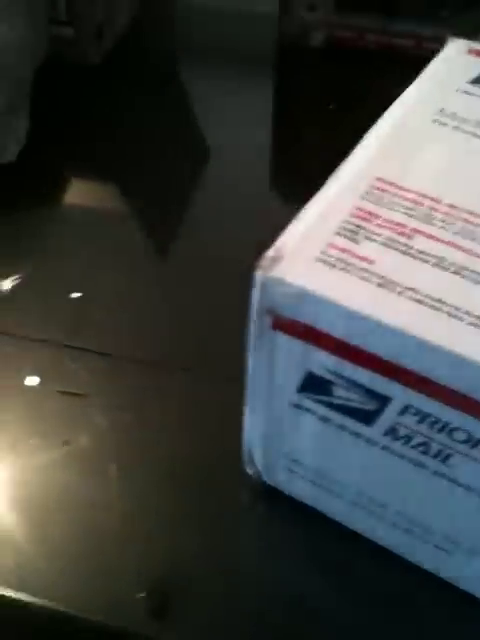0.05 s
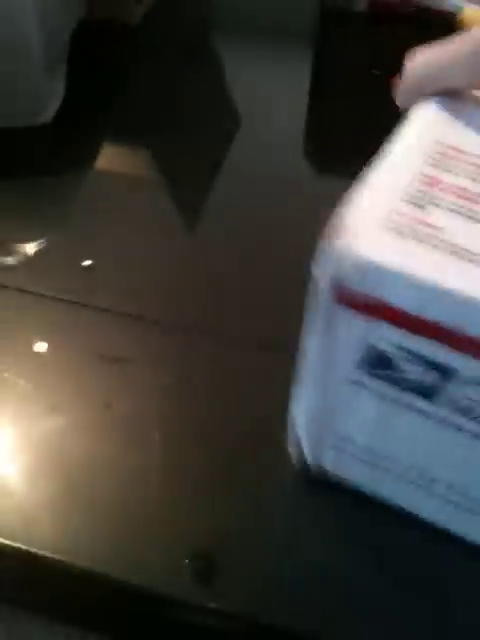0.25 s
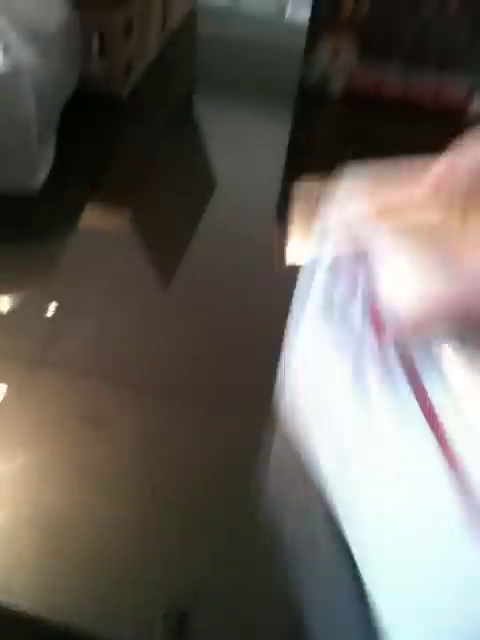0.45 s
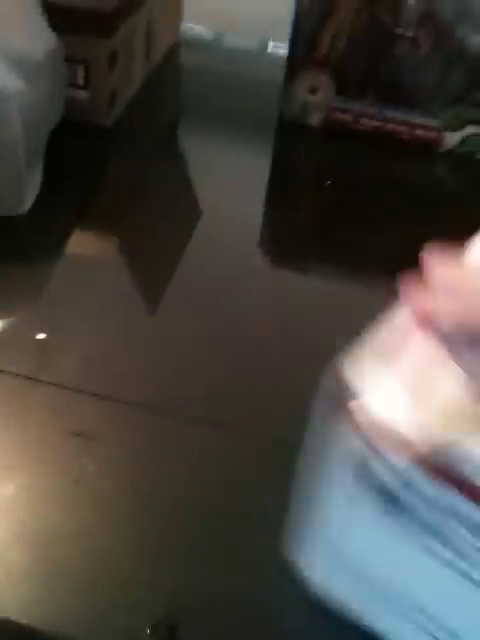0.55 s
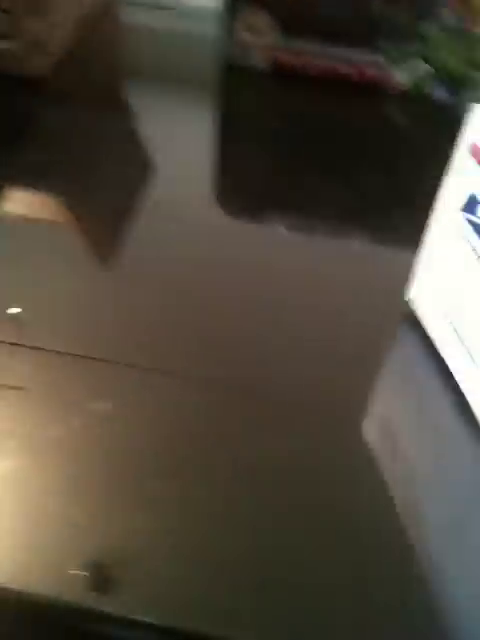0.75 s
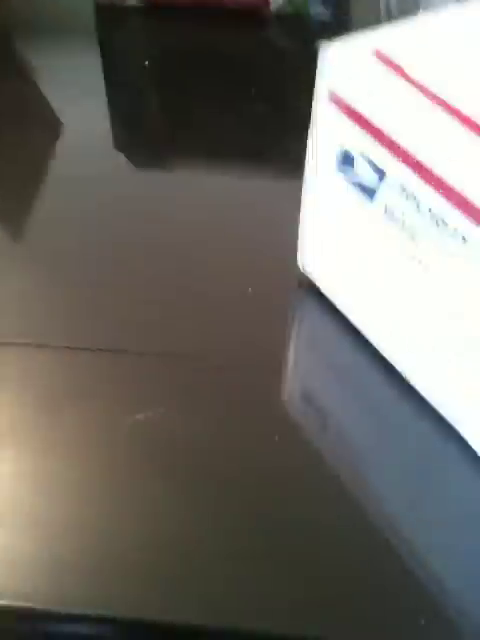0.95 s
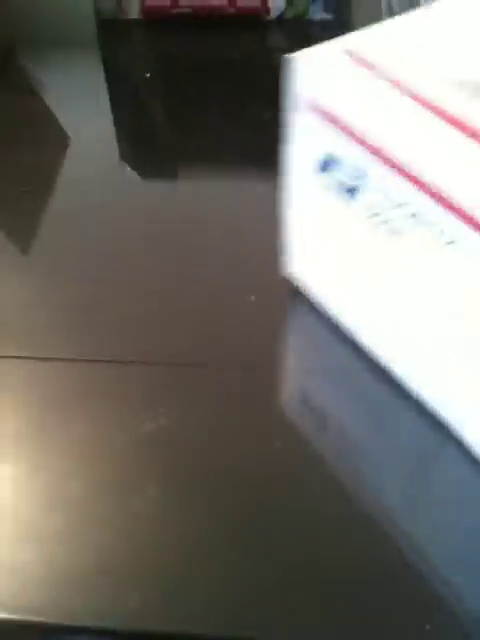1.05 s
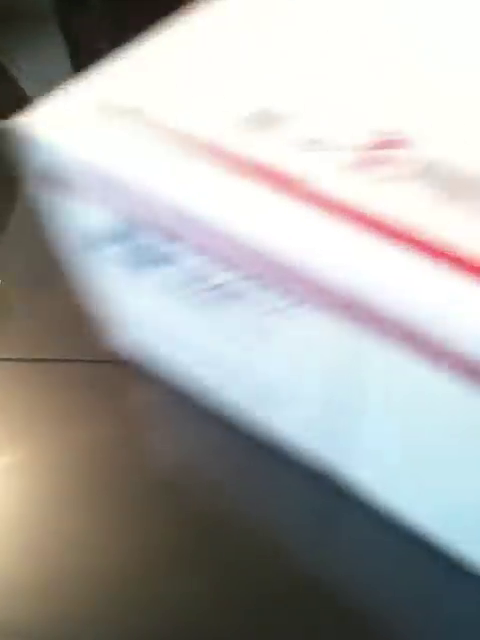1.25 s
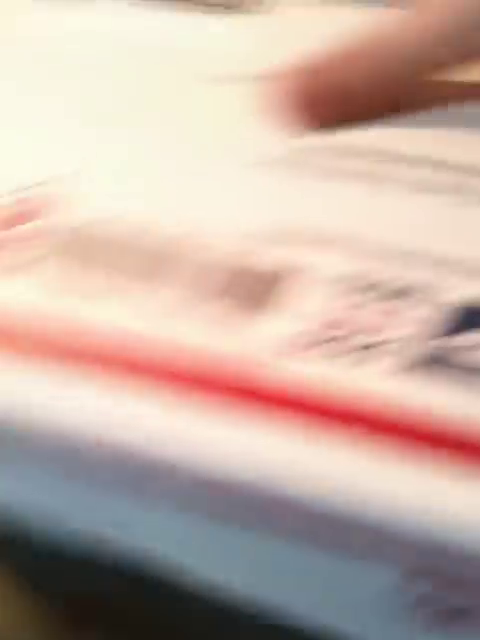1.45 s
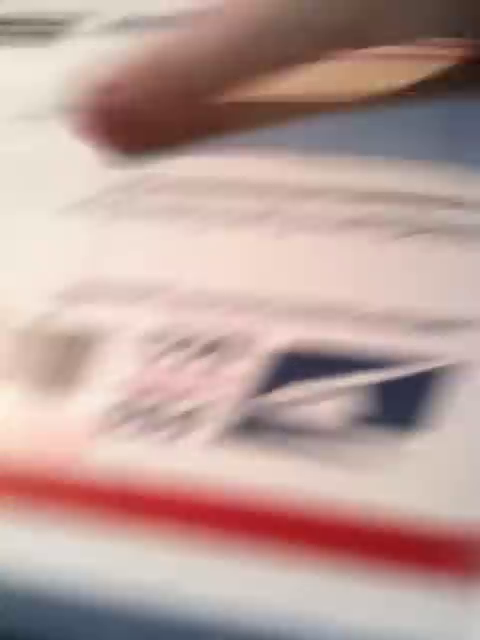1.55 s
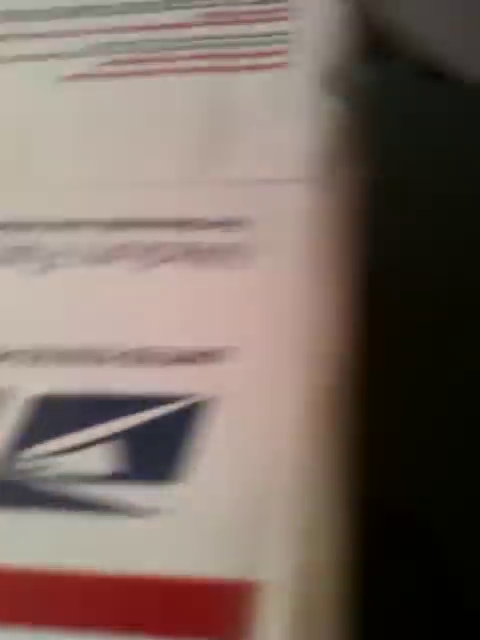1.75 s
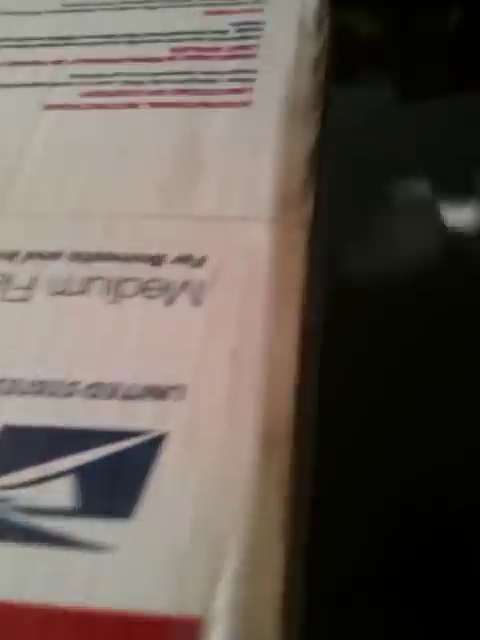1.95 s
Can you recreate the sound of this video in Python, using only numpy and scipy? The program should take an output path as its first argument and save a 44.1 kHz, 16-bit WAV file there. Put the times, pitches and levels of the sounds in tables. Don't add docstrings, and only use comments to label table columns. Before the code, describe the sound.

A cardboard box handled on a glass table, close and thin-sounding. A faint edge scrape and small crackles lead to the loudest sharp, hollow knock at 0.23 s, with crisp crackling until 0.3. Lighter ticks and a softer knock follow at 0.4-0.67. Around 1.08 s a second strong, boxy knock rings briefly. Near quiet from 1.2, then faint finger crackles at 1.8-2.0, over low room hum and hiss.

```python
import sys
import numpy as np
from scipy import signal
from scipy.fft import rfft, irfft
from scipy.io import wavfile
from scipy.ndimage import uniform_filter1d

SR = 44100
rng = np.random.default_rng(int(sys.argv[2]) if len(sys.argv) > 2 else 0)


def elevation(decibels):
    levels = np.asarray(decibels, float)
    return 10 ** (levels / 20)


def pcm_store(signal):
    levels = np.round(np.clip(np.atleast_2d(signal), -1, 1) * 32767)
    wavfile.write(sys.argv[1], SR, levels.astype(np.int16).T)


N = 2 * SR

# (frequency [Hz], level [dB per Hz])
AIR_SPECTRUM = [(18, -45), (30, -5), (157, 3.5), (336, 4), (554, -26), (2060, -7.5), (2900, -35),
                (8980, -22), (16000, -95)]
# (time [s], hiss [dB], wall rumble re hiss [dB], lightness as treble [dB])
SLIDE_PRESSURE = [(0, -61.5, -2.5, 2), (.2, -64, -11, 2), (.45, -68.5, -10.5, 3.5), (.68, -70.5, 12.5, 12),
                  (.74, -60.5, -3.5, 5), (.83, -61, -9.5, 7.5), (.86, -69.5, -3, 0), (1.0, -66, -5, -2),
                  (1.04, -67.5, -12, 7.5), (1.3, -67.5, -5.5, 3.5), (1.6, -67.5, -2.5, 5),
                  (1.67, -61.5, -3.5, 3), (1.71, -66, -2, 5.5), (1.75, -68, -10, 2.5), (2, -66, -14, 0)]
# (frequency [Hz], level [dB per Hz])
RUB_SPECTRUM = [(290, -23.5), (500, -5), (1080, -10), (1190, -18.5), (2070, -11), (4400, -8.5),
                (5310, -8.5), (7750, -8.5), (16000, -20.5)]
# (frequency [Hz], width [Hz], level [dB])
EDGE_RESONANCES = [(820, 250, 0.5), (1600, 580, -1), (4200, 550, 3.5)]
# (time [s], level [dB])
DRAG_LEVEL = [
    (0, -70),
    (.07, -67.5),
    (.15, -66.5),
    (.2, -72),
    (.23, -96),
]
# (time [s], peak [dB], ring time scale [ratio], brightness [dB per octave])
KNOCKS = [(0.0, -54.5, 1.6, 7), (0.185, -57, 6.2, -5.5), (0.2315, -22.5, 0.61, 1), (0.259, -31, 0.69, -1.5),
          (0.299, -49, 0.56, -1), (0.5669, -38.5, 0.52, 0), (0.603, -49.5, 0.52, -1.5),
          (0.667, -51.5, 0.38, 4), (0.891, -64, 0.99, 10.5), (1.0636, -58, 0.62, 1.5),
          (1.0739, -37.5, 0.88, 0), (1.0848, -25, 0.64, 2.5), (1.127, -41, 1.4, -2.5),
          (1.197, -45.5, 0.65, -1), (1.593, -57, 1, -0.5), (1.605, -63, 1.3, -2), (1.672, -51, 0.94, 2.5),
          (1.796, -62.5, 1.25, -4.5)]
# (frequency [Hz], level [dB], t60 [s])
WALL_MODES = [(161, 9, 0.039), (227.6, -3.5, 0.14), (299.5, -6, 0.059), (426.7, 10.5, 0.036),
              (527, -3.5, 0.056), (610, -4, 0.05), (689, 1, 0.028), (813, -1, 0.021), (1002, 1.5, 0.019),
              (1208, -17, 0.06), (1549, -9, 0.041), (1985, -24, 0.062)]
# (frequency [Hz], level [dB], t60 [s])
TURNED_MODES = [(134, -7, 0.22), (183, -5.5, 0.11), (263, 7.5, 0.04), (328.6, -1, 0.046), (389, 5.5, 0.023),
                (540, -9.5, 0.068), (640, -10, 0.051), (980, -6, 0.027), (1314, -17.5, 0.07),
                (1558, -2.5, 0.014), (1752, -6, 0.026), (2020, -18.5, 0.036)]
# (time [s], peak [dB], pitch [Hz], t60 [s], rise [s])
PANEL_RINGS = [(0, -46, 756, 0.052, 0.0019), (.156, -63, 4200, 0.027, .002),
               (.2315, -28, 607, 0.018, 0.0007), (.232, -29.5, 833, 0.031, 0.0007),
               (.234, -24.5, 164, 0.11, 0.0061), (.2605, -49, 800, .04, 0.0012),
               (0.2613, -37, 1943, 0.023, .001), (0.2785, -38, 7400, 0.051, .001),
               (.302, -36, 418, 0.057, 0.0043), (.325, -44, 467, 0.083, 0.0034),
               (.353, -48, 444, 0.059, 0.0035), (.372, -47, 439, 0.15, 0.0036),
               (.567, -48, 980, 0.027, 0.0011), (.665, -52, 1045, .06, .002),
               (.672, -46.5, 376, 0.096, .004), (0.762, -55.5, 1102, 0.063, 0.0021),
               (.775, -51.5, 4440, 0.027, 0.0016), (0.893, -57, 374.5, 0.12, 0.0045),
               (1.011, -53.5, 297, 0.036, 0.0036), (1.0625, -46, 840, 0.026, 0.00084),
               (1.087, -28, 321, 0.078, 0.0014), (1.085, -41, 951, 0.048, 0.0031),
               (1.097, -42, 1400, 0.045, 0.0018), (1.109, -53, 1600, 0.084, 0.0022),
               (1.139, -39, 381, .07, 0.0026), (1.187, -38.5, 417.4, 0.062, 0.003),
               (1.19, -53, 980, 0.041, 0.0023), (1.606, -63, 323, 0.063, 0.0028),
               (1.782, -56.5, 870, 0.037, 0.0018), (1.673, -51.5, 696, 0.027, 0.00092),
               (1.8187, -52, 1600, 0.015, 0.00031), (1.924, -56.5, 3900, .15, 0.0026),
               (1.927, -67, 2100, 0.14, .002)]
# (time [s], peak [dB], strongest pitch [Hz], t60 [s], resonance [dB])
TURN_CRACKLES = [(0.0866, -41.5, 4430, 0.03, -8), (0.1064, -31, 4300, 0.049, 4.5),
                 (0.1118, -28, 4460, 0.027, -1.5), (0.2062, -50, 5960, 0.083, 14),
                 (0.2154, -41, 6900, 0.12, -6), (0.2302, -16, 7740, 0.015, 7),
                 (0.2384, -18, 6900, 0.051, -12), (0.2576, -23.5, 8000, 0.064, -16),
                 (0.2608, -18, 4700, 0.021, -4), (0.2761, -25.5, 7160, 0.091, -14),
                 (0.2882, -35.5, 7180, 0.12, -20), (0.4063, -57, 5100, 0.029, 18),
                 (0.4292, -39, 3730, 0.039, 2.5), (0.5034, -43, 4950, 0.038, 2),
                 (0.5113, -55, 3710, 0.027, 20), (0.5299, -34, 6400, 0.014, 6.5),
                 (0.5683, -33, 7600, 0.069, -11), (0.584, -47, 7700, 0.03, -1),
                 (0.6079, -35, 7550, 0.028, -1), (0.6157, -42, 6100, 0.069, -2),
                 (0.6511, -33.5, 7100, 0.022, -3), (0.6558, -42, 3630, 0.055, 2)]
# (time [s], peak [dB], strongest pitch [Hz], t60 [s], resonance [dB])
FINGER_CRACKLES = [(0.919, -50, 3616, 0.1, -1.5), (0.9255, -31, 3420, 0.03, 9.5),
                   (0.9656, -40.5, 3960, 0.032, -1), (1.013, -45.5, 4200, 0.1, 4),
                   (1.021, -45.5, 4240, 0.037, 8), (1.0844, -18, 1980, 0.084, -25),
                   (1.093, -27, 5360, 0.027, 7.5), (1.0994, -29, 3520, 0.032, 14),
                   (1.147, -39.5, 3850, 0.044, 11.5), (1.1793, -36, 3940, 0.1, -2.5),
                   (1.5373, -65, 5150, 0.035, 19.5), (1.7912, -42, 5240, 0.041, -16),
                   (1.8184, -37.5, 2400, 0.021, 21), (1.8188, -38.5, 6450, 0.043, 8),
                   (1.8235, -36.5, 5600, 0.055, 4.5), (1.8536, -36, 4850, 0.036, 5),
                   (1.8616, -40.5, 7300, 0.025, -4), (1.921, -51, 4070, 0.1, -2),
                   (1.928, -35.5, 4630, 0.059, -5), (1.9334, -42, 5550, 0.034, -6),
                   (1.9533, -36.5, 5170, 0.088, -16), (1.961, -34, 4200, 0.043, 10),
                   (1.9655, -32.5, 4750, 0.025, -8), (1.9715, -37, 4500, 0.036, 3)]
# (frequency [Hz], level [dB])
SKIN_SPECTRUM = [(1000, -15.5), (2200, -6.5), (3000, -8.5), (4200, -0.5), (5500, -3), (7300, 0.5),
                 (10000, -6), (13700, -11), (15800, -18)]
# (frequency [Hz], width [Hz], level [dB])
FILM_RESONANCES = [(2100, 810, -11), (3900, 1600, -7), (5470, 880, 0), (7400, 980, -1.5), (9270, 600, 2),
                   (11700, 540, 4), (13100, 660, 3)]
# (frequency [Hz], t60 [s])
ROOM_DECAY = [(150, 0.36), (500, 0.39), (2000, 0.42), (14000, 0.29)]

TURN_S, FILM_S = 0.92, 1.75


def evened(x):
    return x / np.sqrt(np.mean(x ** 2) + 1e-20)


def read(points, hz):
    f, value = np.transpose(points)
    return np.interp(np.log(hz + 1), np.log(f + 1), value)


def add(mix, s, sound):
    part = mix[round(s * SR):][:len(sound)]
    part += sound[:len(part)]


def colour(x, points):
    log_gain = np.log(elevation(read(points, abs(np.fft.fftfreq(4096, 1 / SR)))))
    taps = np.fft.ifft(np.exp(signal.hilbert(log_gain).conj())).real[:1024]
    return signal.oaconvolve(x, taps / np.linalg.norm(taps))[:len(x)]


def resonate(x, hz, width_hz):
    return signal.lfilter(*signal.iirpeak(hz, hz / width_hz, SR), x)


def clumps(draw, smooth_s, depth_db):
    size = round(smooth_s * SR)
    smooth = uniform_filter1d(uniform_filter1d(draw, size), size)
    return elevation(depth_db * evened(smooth))


def air():
    gain = elevation(read(AIR_SPECTRUM, np.fft.rfftfreq(N, 1 / SR)))
    noise = irfft(rfft(rng.standard_normal(N)) * gain, N)
    return elevation(-69.5) * evened(noise)


def slide():
    times, *curves = np.transpose(SLIDE_PRESSURE)
    t = np.arange(N) / SR
    hiss_db, rumble_db, light_db = (np.interp(t, times, curve) for curve in curves)
    grain, grain_clump, shove, shove_clump = rng.standard_normal((4, N))
    hiss = evened(colour(grain * clumps(grain_clump, 0.0034, 1.3), RUB_SPECTRUM))
    treble = signal.sosfilt(signal.butter(2, 8500, "high", fs=SR, output="sos"), hiss)
    push = shove * clumps(shove_clump, 0.006, 2.5)
    modes = [elevation(db) * evened(resonate(push, hz, 5 / t60)) for hz, db, t60 in WALL_MODES]
    rumble = evened(sum(modes))
    return elevation(hiss_db - 3) * (hiss + (elevation(light_db) - 1) * treble + elevation(rumble_db) * rumble)


def drag():
    friction = rng.standard_normal(N)
    rings = sum(elevation(db) * evened(resonate(resonate(friction, hz, width), hz, width))
                for hz, width, db in EDGE_RESONANCES)
    level_db = np.interp(np.arange(N) / SR, *np.transpose(DRAG_LEVEL))
    return elevation(level_db) * evened(rings)


def thumps():
    trim_db, swell_cycles = -3, 0.44
    thud_db, thud_hz, thud_t60_s = -13, 860, 0.038
    out, t = np.zeros(N), np.arange(int(0.3 * SR)) / SR
    draws = rng.standard_normal((len(KNOCKS), 2, len(WALL_MODES)))
    for (s, peak_db, ring, bright_db), (spot, detune) in zip(KNOCKS, draws):
        modes = WALL_MODES if s < TURN_S else TURNED_MODES
        hz, db, t60 = np.transpose(modes)[:, :, None]
        level_db = db + 0.84 * spot[:, None] + bright_db * np.log2(hz / 400) - 60 * t / (t60 * ring)
        swell = 1 - np.exp(-t * hz / swell_cycles)
        tones = np.sin(2 * np.pi * hz * (1 + 0.025 * detune[:, None]) * t)
        body = (swell * elevation(level_db) * tones).sum(0)
        crush = evened(resonate(rng.standard_normal(len(t)), thud_hz, 2 * thud_hz))
        body += elevation(thud_db + bright_db - 60 * t / thud_t60_s) * crush
        body *= 1 - np.exp(-t / 0.0005)
        attack_rms = np.sqrt(np.mean(body[:400] ** 2))
        add(out, s, elevation(peak_db + trim_db) * body / attack_rms)
    return out


def panels():
    out, t = np.zeros(N), np.arange(int(0.2 * SR)) / SR
    for s, peak_db, hz, t60, rise in PANEL_RINGS:
        envelope = (1 - np.exp(-t / rise)) * elevation(peak_db - 60 * t / t60)
        add(out, s, envelope * np.sin(2 * np.pi * hz * t))
    return out


def crackles(bursts):
    trim_db, tick_share, tick_s = -11.5, 0.18, 0.0005
    rise_s, breakup_s = 0.0005, 0.005
    dull_db, width_hz = 0.12, 1700
    out, t = np.zeros(N), np.arange(int(0.2 * SR)) / SR
    draws = rng.standard_normal((len(bursts), 2, len(t)))
    for (s, peak_db, hz, t60, ring_db), (grain, clump) in zip(bursts, draws):
        clumping = clumps(clump, 0.0008, 4) ** np.minimum(t / breakup_s, 1)
        grains = evened(grain * clumping) * elevation(-60 * t / t60)
        tick = 4 * tick_share * np.sign(grain) * np.exp(-t / tick_s)
        drive = np.minimum(t / rise_s, 1) * (1 - tick_share) * grains + tick
        slope_db = dull_db * (peak_db + 19)
        skin = [(f, db + slope_db * max(np.log2(f / 7000), 0)) for f, db in SKIN_SPECTRUM]
        paper = colour(drive, skin)
        if s > FILM_S:
            film = sum(elevation(0.5 + db) * resonate(paper, f, width) for f, width, db in FILM_RESONANCES)
            paper = elevation(-8) * paper + film
        ring = resonate(resonate(paper, hz, width_hz), hz, width_hz)
        add(out, s + 0.0011, elevation(peak_db + trim_db) * (paper + elevation(ring_db) * ring))
    return out


def room(x):
    taps = np.zeros(SR // 2)
    at = np.arange(300, len(taps) - 20, 20)
    taps[at + rng.integers(0, 20, len(at))] = rng.choice([-1., 1.], len(at))
    hz, t, z = signal.stft(taps, SR, nperseg=256)
    decay = elevation(-60 * t / read(ROOM_DECAY, hz)[:, None])
    tail = signal.istft(z * decay, SR, nperseg=256)[1]
    return signal.fftconvolve(x, tail / np.linalg.norm(tail))[:N]


def scene():
    box = thumps() + panels() + crackles(TURN_CRACKLES) + crackles(FINGER_CRACKLES)
    mix = box + elevation(-11) * room(box) + slide() + air() + drag()
    return mix[None]


def band_limit(x):
    return signal.sosfilt(signal.butter(12, 16480, fs=SR, output="sos"), x)


def record(dry):
    thin = signal.sosfilt(signal.butter(2, 191, "high", fs=SR, output="sos"), dry)
    mix = signal.sosfilt(signal.ellip(8, 0.5, 30, 15800, fs=SR, output="sos"), thin)
    return band_limit(mix)


dry = scene()
out = record(dry)
pcm_store(out)
```